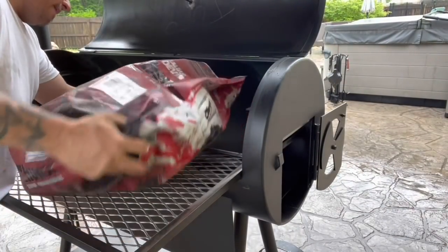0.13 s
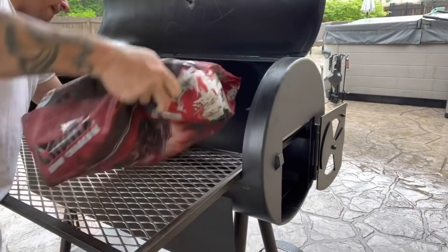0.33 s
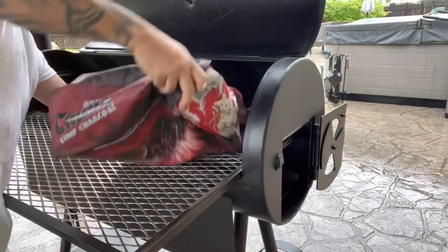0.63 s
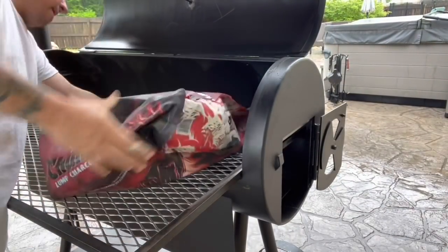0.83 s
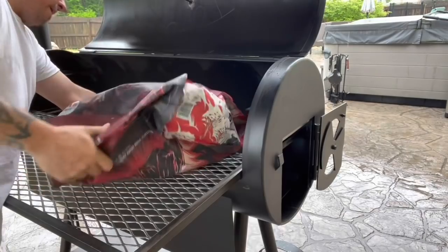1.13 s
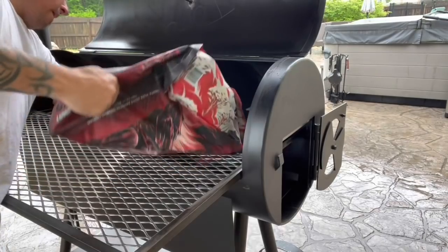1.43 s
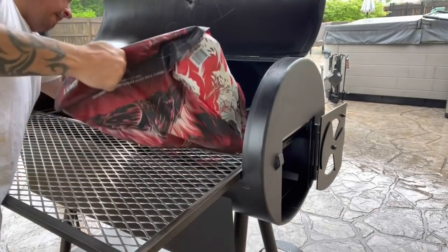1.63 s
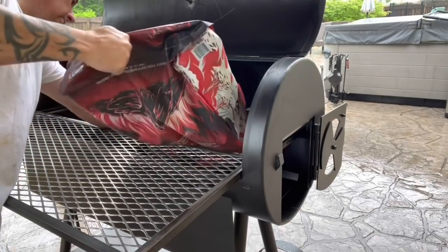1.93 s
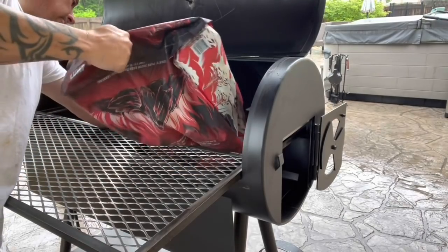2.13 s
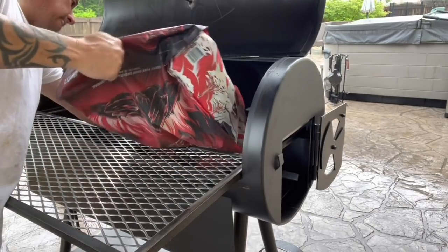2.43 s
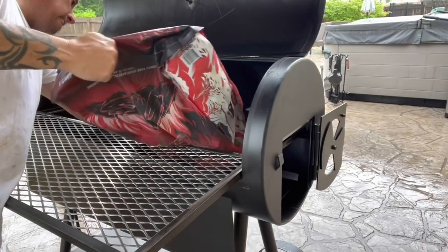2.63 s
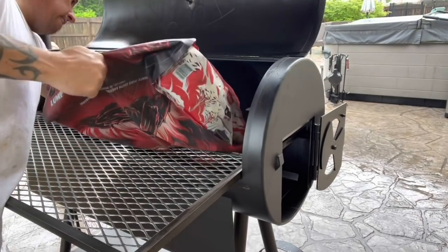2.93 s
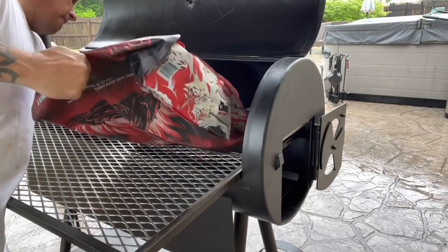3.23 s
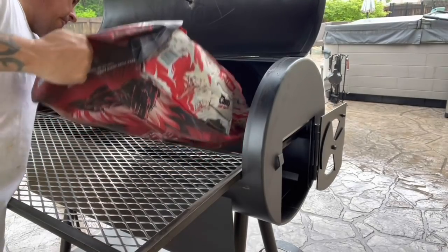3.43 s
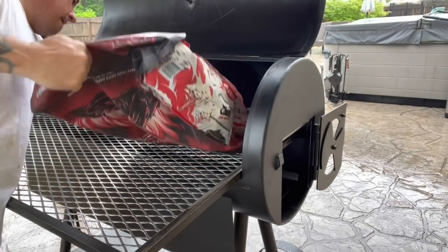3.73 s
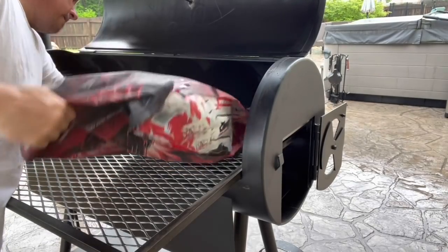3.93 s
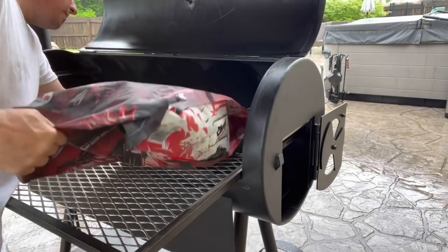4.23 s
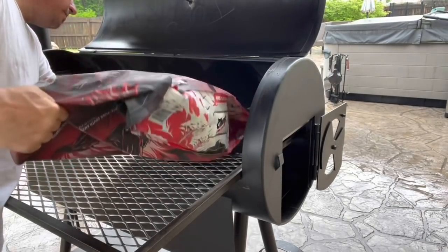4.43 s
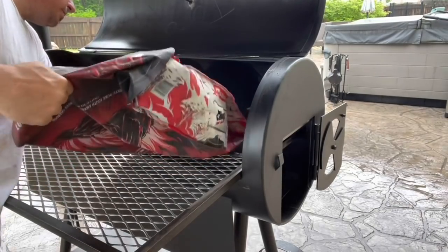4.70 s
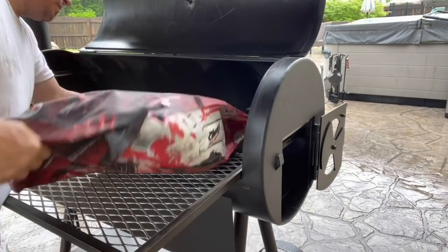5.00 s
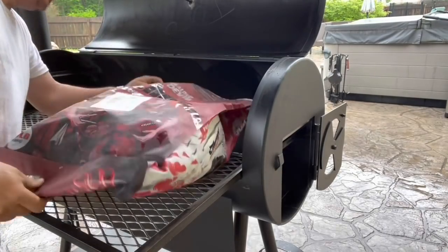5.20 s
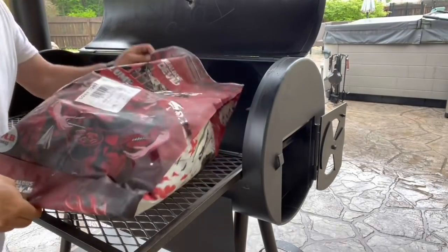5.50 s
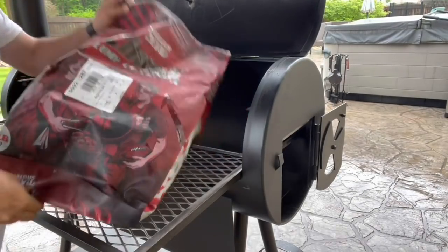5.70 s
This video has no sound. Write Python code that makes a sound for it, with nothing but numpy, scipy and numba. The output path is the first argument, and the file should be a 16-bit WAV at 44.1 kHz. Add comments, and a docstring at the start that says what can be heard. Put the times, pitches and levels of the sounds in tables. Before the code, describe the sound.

A stiff paper sack scrapes and crackles over metal mesh, then charcoal clatters into a steel barrel and thins to scattered clinks outdoors.

```python
"""A stiff paper sack scrapes, snaps and crumples as it is dragged over a mesh shelf and tipped in a quiet yard.
The paper is made of dense ticks, sharp pulses, short crunches and a few gliding squeals.
Charcoal slides out as a stream of small ringing strikes, then lumps clatter and clink one by one.
A steel barrel rings under them with fixed tones and a short noisy echo; low shudder and faint air lie below."""
import sys
import numpy as np
from scipy import signal
from scipy.fft import rfft, irfft, next_fast_len
from scipy.io import wavfile
from scipy.ndimage import uniform_filter1d
from numba import njit

SR = 44100
rng = np.random.default_rng(int(sys.argv[2]) if len(sys.argv) > 2 else 0)


def transcribe(u):
    """Save the signal u as a 16-bit wav file named by the first command-line argument.

    u: samples, shape (n,) or (channels, n), limited to [-1, 1]; the rate is SR.
    q: integer samples, one column per channel.
    """
    v = np.clip(np.atleast_2d(u).T, -1, 1)
    q = np.round(v * 32767).astype(np.int16)
    wavfile.write(sys.argv[1], SR, q)


N = 258293  # length in samples

# tone colour of rubbing paper: f/Hz, relative level/dB
PAPER = [(59, -41), (100, -25), (157, -11.5), (202, -8), (473, -1.5), (1110, -4.5), (1420, -4.5),
         (2830, -3), (3990, -5.5), (6610, -7), (7500, -15), (9750, -33), (16500, -120)]
# strokes of the sack scraping and crumpling: t/s, hold/s, level/dB,
# part above 2.5 kHz against the level/dB (before the treble setting in sack), low thud against the level/dB
STROKES = [(0, 0.052, -34.5, -3, -35), (.059, 0.13, -33.5, 1.5, -31), (0.157, 0.049, -28.5, -3.5, -34),
           (.212, .16, -29, 1, -33), (0.382, .35, -30, 5, -31.5), (0.727, 0.058, -29, 6, -37),
           (.792, 0.049, -25, 3.5, -33), (0.853, .12, -34.5, 4, -34), (1.092, 1.18, -43.5, 1.5, -28.5),
           (4.507, 0.037, -30.5, -19, -28), (4.548, 0.07, -34, 1, -27), (4.68, 0.032, -26, -2.5, -27),
           (4.725, .036, -34.5, 4.5, -30), (4.759, 0.046, -30, 3, -24), (5.771, .069, -36, -8.5, -24)]
# charcoal sliding out of the sack: t/s, level/dB
FLOW = [(.95, -37.5), (1.18, -35), (1.39, -37.5), (1.5, -43.5), (1.72, -40), (1.85, -33.5), (2.18, -24),
        (2.42, -31), (2.52, -43), (3.05, -43.5), (3.21, -58)]
# ringing tones (modes) of the steel barrel and its grate: f/Hz, relative level/dB, t60/s
STEEL = [(458, -12, .35), (797, -9, .22), (1247, -6, .6), (1317, -4, .5), (1565, -9, .6), (1819, -8, .4),
         (2055, 1.5, .5), (2183, -2, .55), (2285, -2, .35), (2568, -3, .55), (2800, -10, .4),
         (3176, -3, .35), (3296, -2, .35), (3558, -9, .35), (3790, -9, .35), (4062, 2, .3), (4334, -6, .25),
         (4873, -4, .3), (5192, -3, .28), (5696, -7, .2), (6317, -3, .18), (6477, -2, .18)]
TOP_HZ = 7120  # little is heard above this
CLINK_OCTAVES = 0.14  # spread of the tones of one lump


def undb(db):
    """Turn decibels into a gain."""
    return 10 ** (np.asarray(db) / 20)


def unit(x):
    """Scale to an average strength (rms) of 1."""
    return x / np.sqrt(np.mean(x ** 2) + 1e-20)


def curve(rows, outside=None):
    """Join rows of (time in s, value) by straight lines."""
    rows = np.asarray(rows, float)
    return np.interp(np.arange(N) / SR, rows[:, 0], rows[:, 1], outside, outside)


def add(track, s, x):
    """Mix a sound into the track at time s."""
    start = max(int(s * SR), 0)
    track[start:start + len(x)] += x[:max(N - start, 0)]


def fade(t, t60):
    """Die away exponentially, by 60 dB in t60 seconds."""
    return np.exp(-np.log(1000) * t / t60)


def colour(x, points):
    """Filter a sound by a curve of (Hz, dB) points and scale it to rms 1."""
    hz, db = np.transpose(points)
    f = np.arange(len(x) // 2 + 1) * SR / len(x)
    gain = undb(np.interp(np.log(f + 1), np.log(hz), db))
    return unit(np.fft.irfft(rfft(x) * gain, len(x)))


def bell(centre_hz, octaves, size=2048):
    """Response of a damped piece to a tap: one broad hump of pitch, scaled to energy 1."""
    f = np.arange(size // 2 + 1) * SR / size + 1
    hump = -(np.log2(f / centre_hz) / octaves / 2) ** 2
    log_gain = hump - np.maximum(f - TOP_HZ, 0) / 500
    # folding the cepstrum makes the response start at once (minimum phase)
    cepstrum = irfft(np.maximum(log_gain, -6.6))
    cepstrum[1:size // 2] *= 2
    cepstrum[size // 2 + 1:] = 0
    response = irfft(np.exp(rfft(cepstrum)))
    return response / np.linalg.norm(response)


def grains(n, rate, scatter_db):
    """Tiny contacts at random moments (rate per second), with scattered strengths; rms 1."""
    size = undb(scatter_db * np.minimum(rng.exponential(size=n), 4))
    happens = rng.random(n) < rate / SR
    return unit(happens * size * rng.choice([-1, 1], n))


def walk(rate):
    """Smooth random wander with rms near 1, drawing a new value rate times a second."""
    k = max(int(SR / rate), 1)
    steps = np.repeat(rng.standard_normal(N // k + 1), k)
    return unit(uniform_filter1d(steps, k)[:N])


def split(x, hz):
    """Separate the parts below and above hz."""
    low = signal.sosfiltfilt(signal.butter(3, hz, fs=SR, output="sos"), x)
    return low, x - low


@njit
def resonant_highpass(x, hz, damping):
    """Remove the lows with a filter whose edge moves and whose peak grows as damping falls."""
    y, b, l = np.empty(len(x)), 0., 0.
    for i in range(len(x)):
        g = np.tan(np.pi * hz[i] / SR)
        v = (b + g * (x[i] - l)) / (1 + g * (g + damping))
        low = l + g * v
        y[i] = x[i] - damping * v - low
        b, l = 2 * v - b, 2 * low - l
    return y


def gesture(s, hold_s, attack_s=0.0051, release_t60=0.11):
    """Loudness of one hand movement: a quick rise, a hold, then a decay."""
    t = np.maximum(np.arange(N) / SR - s, 0)
    return (1 - np.exp(-t / attack_s)) * fade(np.maximum(t - hold_s, 0), release_t60)


def jostle(low_hz, rate, scatter_db, ring_t60, patchy_db, count=14):
    """Pieces of many sizes are struck at their own moments, small ones more often; each strike dies away."""
    decay = fade(np.arange(SR // 12) / SR, ring_t60)
    out = np.zeros(N)
    for piece_hz in np.geomspace(low_hz, 6800, count):
        strikes = grains(N, rate * np.sqrt(piece_hz / low_hz), scatter_db) * undb(patchy_db * walk(35))
        energy = np.abs(signal.oaconvolve(strikes ** 2, decay ** 2)[:N])
        ringing = np.sqrt(energy) * rng.standard_normal(N)
        # higher pieces cover a wider band, so they carry more of the energy
        out += np.sqrt(piece_hz) * unit(signal.oaconvolve(ringing, bell(piece_hz, .17))[:N])
    return unit(out)


def knocks(table, rise_s, tone_share, tick_db, count=3):
    """A struck thing chatters briefly and rings in a tight cluster of tones."""
    out, t = np.zeros(N), np.arange(SR // 3) / SR
    for s, db, pitch_hz, octaves, t60 in table:
        spread = np.linspace(-.8, .8, count) + 0.16 * rng.standard_normal(count)
        mode_hz = pitch_hz * 2 ** (octaves * spread)
        modes = unit(np.sin(2 * np.pi * (np.outer(t, mode_hz) + rng.random(count))).sum(axis=1))
        chatter = unit(signal.fftconvolve(grains(len(t), 3000, 2.75), bell(pitch_hz, octaves))[:len(t)])
        tick = undb(tick_db) * grains(len(t), 3000, 2) * fade(t, 0.013)
        ring = (tone_share * modes + 0.84 * chatter) * fade(t, t60)
        add(out, s, undb(db) * (1 - np.exp(-t / rise_s)) * (ring + tick))
    return out


def rattles(rows, rattle_rate, scatter_db, ring_t60, ring_share, treble_life):
    """Each row is a run of small contacts that ring the pieces and die away, the treble first."""
    out = np.zeros(N)
    for s, db, centre_hz, octaves, t60, rise_s in rows:
        t = np.arange(next_fast_len(max(int(t60 * SR), 4096))) / SR
        ring = rng.standard_normal(len(t)) * fade(t, ring_t60)
        ring *= ring_share / np.linalg.norm(ring)
        ring[0] += .7  # the direct tap ahead of its ring
        contacts = rfft(grains(len(t), rattle_rate, scatter_db))
        rattle = irfft(contacts * rfft(ring) * rfft(bell(centre_hz, octaves), len(t)), len(t))
        # after a soft start, the motion comes to rest around t60
        moving = (1 - np.exp(-t / rise_s)) * np.exp(-(t / t60) ** 4)
        strength = np.sqrt(np.average(rattle ** 2, weights=(moving * fade(t, t60)) ** 2))
        low, high = split(rattle / strength, 2900)
        add(out, s, undb(db) * moving * (low * fade(t, t60) + high * fade(t, t60 * treble_life)))
    return out


def yard(level_db=-54.5, waver_db=0.84):
    """Faint outdoor air: coloured noise that wavers slightly."""
    # tone colour of the air: f/Hz, relative level/dB
    air_colour = [(18, -67), (30, -43), (81, -27), (360, -6.5), (1100, -7.5), (3000, -10.5), (7400, -15),
                  (9750, -40.5), (16500, -120)]
    return undb(level_db + waver_db * walk(6)) * colour(rng.standard_normal(N), air_colour)


def cart(coal, shudder_db=-47):
    """The legs under the barrel shudder: noise below 85 Hz follows the strength of the charcoal."""
    load = np.sqrt(np.abs(uniform_filter1d(coal ** 2, SR // 50)))
    return undb(shudder_db) * load * unit(split(rng.standard_normal(N), 85)[0])


def barrel(x, steel_db=-52, hollow_db=-12, hollow_t60=0.093):
    """The steel rings in its own tones, and the open barrel throws back a short dense echo."""
    # how freely the steel rings, on top of steel_db: t/s, level/dB
    ringing_curve = [(0, -3.5), (.9, -10), (1.05, -3), (1.7, -24), (2.05, -2), (3.1, -4), (3.22, -14)]
    t = np.arange(SR) / SR
    modes = sum(undb(db) * np.cos(2 * np.pi * hz * t) * fade(t, t60) for hz, db, t60 in STEEL)
    echo_colour = [(200, -21), (450, 4.5), (2200, -1.0), (7000, -2.5), (9000, -29.5)]  # f/Hz, level/dB
    echo = colour(rng.standard_normal(SR), echo_colour) * fade(t, hollow_t60)
    steel = undb(steel_db + curve(ringing_curve)) * signal.fftconvolve(x, modes)[:N]
    return steel + undb(hollow_db) * signal.fftconvolve(x, echo / np.linalg.norm(echo))[:N]


def clangs(knock_db=-3, knock_t60=0.0066, knock_octaves=0.74, clang_octaves=0.06):
    """A lump meets bare steel: a dry noisy knock, then the few steel tones near one pitch ring on."""
    # strikes on steel: t/s, level of the ring at its start/dB, centre f/Hz, share of the free ring time
    steel_hits = [(1.022, -21.5, 5020, 0.42), (1.032, -30.5, 2100, 0.51), (1.068, -34.5, 4300, 0.51),
                  (2.05, -24, 2060, 0.97), (2.051, -23, 3200, 0.44), (2.854, -32.5, 2190, 0.65),
                  (2.939, -30, 2200, .8), (2.957, -31.5, 1260, 0.99), (3.058, -21, 4030, 0.64),
                  (3.918, -32.5, 2150, 0.8), (4.099, -31.5, 1480, 0.37), (4.126, -37.5, 3650, .4),
                  (5.054, -33.5, 2260, 0.6)]
    out, t = np.zeros(N), np.arange(SR) / SR
    hz, mode_db, t60 = np.transpose(STEEL)
    for s, db, centre_hz, life in steel_hits:
        nearness = np.exp(-np.square(np.log2(hz / centre_hz) / clang_octaves / 2))
        weight = undb(mode_db) * nearness
        modes = np.sin(2 * np.pi * (np.outer(t, hz) + rng.random(len(hz)))) * fade(t[:, None], life * t60)
        ring = np.sqrt(2) * modes @ weight / np.linalg.norm(weight)
        burst = rng.standard_normal(SR) * fade(t, knock_t60)
        knock = signal.fftconvolve(burst, bell(centre_hz, knock_octaves))[:SR]
        add(out, s, undb(db) * (ring + undb(knock_db) * knock))
    return out


def stray_clinks(coal, clink_db=2, low_hz=750, high_hz=6000, t60=0.022, count=60):
    """Lumps of every size knock together at chance moments, as hard as the charcoal is moving."""
    flow_s, _ = np.transpose(FLOW)
    rows = []
    for when, size in rng.random((count, 2)):
        s = flow_s.min() + when * np.ptp(flow_s)
        motion_db = 20 * np.log10(np.std(coal[int(s * SR):][:SR // 50]))
        rows.append((s, motion_db + clink_db, low_hz * (high_hz / low_hz) ** size, CLINK_OCTAVES, t60))
    return knocks(rows, rise_s=0.00047, tone_share=0.67, tick_db=-11.5)


def clinks(clink_t60=0.055):
    """Single hard lumps knock together and ring briefly, each at its own pitch."""
    # knocks of lump on lump: t/s, level/dB, pitch f/Hz
    lump_knocks = [(1.32, -22.5, 6420), (2.186, -19, 1820), (3.238, -32.5, 4690), (3.306, -31, 2040),
                   (3.535, -29, 2660), (3.696, -34, 5530), (3.81, -34, 6660), (3.834, -31, 5710),
                   (4.022, -29.5, 5220), (4.059, -27.5, 5760), (4.172, -33, 5360), (4.229, -21, 5640),
                   (4.428, -34, 2860), (4.86, -32, 3250), (4.965, -27, 5600), (5.047, -26.5, 5970),
                   (5.094, -25, 6770), (5.467, -38, 4510)]
    rows = [(s, db, hz, CLINK_OCTAVES, clink_t60) for s, db, hz in lump_knocks]
    return knocks(rows, rise_s=0.0014, tone_share=0.56, tick_db=-19.5)


def landings():
    """Each lump lands brightly and also shifts the bed of charcoal, which sounds lower and slower."""
    # lumps tumbling into the barrel: t/s, level/dB, centre f/Hz, spread/octaves, t60/s, rise/s
    lump_falls = [(1.021, -19.5, 4400, 0.19, 0.23, 0.0018), (1.03, -27, 2200, 0.27, 0.49, .003),
                  (1.16, -25, 1210, 0.76, 0.12, 0.0069), (1.906, -22, 4640, 0.41, 0.21, 0.001),
                  (2.0488, -10.5, 2900, 0.53, 0.28, 0.00049), (2.153, -13.5, 4200, 0.67, 0.071, .001),
                  (2.164, -18.5, 1350, 0.8, 0.4, 0.0024), (2.42, -23.5, 2850, 0.5, 0.2, 0.0025),
                  (2.486, -25.5, 4320, 0.55, 0.4, 0.003), (2.565, -29.5, 2500, 0.62, 0.82, 0.011),
                  (2.638, -19, 4430, 0.65, 0.23, 0.0083), (2.702, -27, 1720, 0.91, 0.15, 0.0019),
                  (2.782, -24.5, 2490, 0.49, 0.39, 0.021), (2.853, -28, 1920, 0.35, 0.69, 0.0014),
                  (2.892, -24.5, 3730, 0.26, 0.29, 0.012), (2.938, -17, 2770, 0.44, 0.26, 0.0021),
                  (2.949, -19, 2660, 0.7, 0.52, 0.013), (3.0566, -13, 4000, 0.68, 0.26, 0.00099),
                  (3.125, -23.5, 1510, 0.71, 0.12, 0.0065), (3.498, -24.5, 2730, 0.51, 0.14, 0.01),
                  (3.781, -23, 3980, 0.8, 0.17, 0.0075), (3.913, -19.5, 2950, 0.42, 0.26, 0.0056),
                  (4.098, -22, 1610, 0.6, 0.11, 0.0006), (4.125, -28.5, 1550, 0.65, 0.19, .002),
                  (5.0, -28.5, 2590, 0.18, 0.24, 0.00092), (5.052, -20, 1960, 0.65, 0.18, 0.01),
                  (5.084, -21.5, 3200, 0.73, 0.16, 0.0023), (5.172, -24, 3250, 0.26, 0.1, 0.004),
                  (5.253, -23, 3480, 0.41, 0.11, 0.0047)]
    bed_hz, bed_octaves, bed_t60, bed_rise_s = 1230, 0.51, 0.21, 0.014
    # the shift is -4.5 dB under a landing of 0 dB, and drops by 1.57 dB for each dB the landing drops
    shifts = [(s, -4.5 + 1.57 * db, bed_hz, bed_octaves, bed_t60, bed_rise_s) for s, db, *_ in lump_falls]
    return list(lump_falls) + shifts


def drops():
    """Lumps tumble into the barrel: each one is a ringing rattle of contacts."""
    return rattles(landings(), rattle_rate=1500, scatter_db=1.4, ring_t60=0.053, ring_share=0.54,
                   treble_life=0.79)


def slide(dust_db=-5, surge_db=1.0, ring_t60=0.044):
    """Lumps jostle in small surges over a crackle of sliding crumbs."""
    # tone colour of sliding charcoal: f/Hz, relative level/dB
    coal_colour = [(59, -54.5), (100, -17.5), (290, -16), (464, -4), (527, -7), (784, -4.5), (1050, -11.5),
                   (1210, -7), (2120, -2), (2450, -6), (5930, -5.5), (6730, -13), (7500, -8), (9750, -61),
                   (16500, -120)]
    lumps = jostle(low_hz=450, rate=90, scatter_db=3.1, ring_t60=ring_t60, patchy_db=2.5)
    crumbs = undb(dust_db) * grains(N, 3000, 3.1)
    stream = colour(lumps + crumbs, coal_colour)
    return undb(curve(FLOW, outside=-120) + surge_db * walk(45)) * stream


def settling(flutter_db=4):
    """Paper and crumbs rustle faintly with every gentle shake."""
    # gentle shakes of the nearly empty sack: t/s, hold/s, level/dB
    shake_table = [(3.435, 0.061, -50.5), (3.555, 0.12, -49), (3.756, 0.11, -48), (4.817, 0.164, -46),
                   (4.996, 0.29, -52.5)]
    shaking = sum(undb(db) * gesture(s, hold_s) for s, hold_s, db in shake_table)
    return shaking * undb(flutter_db * walk(30)) * colour(grains(N, 900, 1.7), PAPER)


def bumps(bump_cycles=44):
    """The sack knocks on the shelf with a soft, hollow ring; low bumps last longer."""
    # bumps on the shelf: t/s, level/dB, pitch f/Hz, spread/octaves
    shelf_bumps = [(0.018, -36.5, 174, 0.27), (.511, -13.5, 516, 0.09), (0.798, -29.5, 334, 0.5),
                   (.824, -24, 506, 0.29), (2.628, -33.5, 475, 0.34), (3.236, -36, 468, 0.17),
                   (3.27, -32.5, 773, 0.18), (3.547, -25, 810, 0.45), (3.655, -40, 630, 0.23),
                   (3.863, -30, 624, 0.39), (4.464, -37, 500, 0.6), (4.523, -24, 403, 0.28),
                   (4.597, -24.5, 448, 0.52), (4.687, -29.5, 370, 0.43), (4.775, -19, 690, 0.37),
                   (4.865, -26, 474, 0.57), (5.144, -35.5, 533, 0.47), (5.756, -35, 268, 0.57),
                   (5.785, -31, 330, 0.51)]
    rows = [(s, db, hz, octaves, bump_cycles / hz) for s, db, hz, octaves in shelf_bumps]
    return knocks(rows, rise_s=0.0018, tone_share=0.4, tick_db=-10.0)


def squeals(attack_s=0.0018, release_t60=0.062, wobble_hz=60, tone_flutter_db=4):
    """The sack sticks and slips at one resonance: a gliding tone that wobbles more the rougher the grip."""
    # groans and squeaks: t/s, hold/s, level/dB, start f/Hz, end f/Hz, roughness from 0 to 1
    squeal_table = [(0, 0.044, -30.5, 328, 320, 0.27), (.39, 0.12, -31.5, 512.4, 570, 0.67),
                    (.53, 0.078, -36.5, 517, 575, 0.8), (0.647, 0.013, -21.5, 2880, 2830, 0.7)]
    out, t = np.zeros(N), np.arange(SR // 4) / SR
    for s, hold_s, db, start_hz, end_hz, rough in squeal_table:
        glide = np.interp(t, [0, hold_s], [start_hz, end_hz])
        hz = glide + rough * wobble_hz * walk(250)[:len(t)]
        flutter = undb(rough * tone_flutter_db * walk(140)[:len(t)])
        grip = (1 - np.exp(-t / attack_s)) * fade(np.maximum(t - hold_s, 0), release_t60)
        tone = unit(np.sin(2 * np.pi * np.cumsum(hz) / SR) * flutter)
        add(out, s, undb(db) * grip * tone)
    return out


def crunches(rise_s=0.00073):
    """A fold of the sack gives way in a quick run of dry ticks."""
    # collapsing folds: t/s, level/dB, centre f/Hz, spread/octaves, t60/s
    fold_table = [(0.23, -22, 1000, 0.57, 0.035), (.294, -15.5, 2300, 1.1, 0.11),
                  (.512, -17.5, 2200, 0.5, 0.084), (.648, -24, 2900, .5, 0.065),
                  (.709, -16, 3500, 0.83, 0.036), (0.91, -20.5, 6360, .25, 0.063),
                  (1.285, -7.5, 2520, 0.24, 0.014), (1.319, -22.5, 1700, 1.1, 0.071),
                  (1.559, -26.5, 2400, 1.1, 0.046), (1.807, -17.5, 2070, 1.03, 0.088),
                  (3.544, -26.5, 1480, 0.83, 0.068), (3.739, -29.5, 1680, 0.33, 0.025),
                  (3.861, -20, 2420, 0.43, 0.045), (4.514, -29, 1290, 0.61, 0.061),
                  (4.53, -25.5, 1110, 0.66, 0.096), (4.552, -23, 2940, 0.24, 0.092),
                  (4.604, -25.5, 1410, 0.82, 0.051), (4.691, -17.5, 1900, 0.9, 0.062),
                  (4.739, -24.5, 2880, 0.32, 0.21), (4.765, -19.5, 2700, 0.53, 0.043),
                  (4.775, -16.5, 890, 0.77, 0.037), (4.787, -17.5, 2300, 0.46, 0.032),
                  (4.801, -22, 3530, 0.6, 0.11), (4.866, -31.5, 2000, 0.51, 0.1),
                  (4.942, -30, 2800, 0.91, 0.046), (5.203, -26.5, 2600, 0.41, 0.057),
                  (5.275, -30, 1510, 0.56, 0.055)]
    rows = [(*row, rise_s) for row in fold_table]
    return rattles(rows, rattle_rate=2400, scatter_db=1.5, ring_t60=0.0035, ring_share=0.4, treble_life=0.7)


def stray_snaps(count=50, stray_db=-4, stray_hz=1870):
    """Small snaps at chance moments follow the strength of the strokes: rows of t/s, level/dB, f/Hz."""
    effort = sum(undb(db) * gesture(s, hold_s) for s, hold_s, db, *_ in STROKES)
    rows = []
    for when, size in rng.random((count, 2)):
        stroke_db = 20 * np.log10(effort[int(when * N)] + 1e-9)
        # up to an octave either side of stray_hz
        rows.append((when * N / SR, stroke_db + stray_db, stray_hz * 2 ** (2 * size - 1)))
    return rows


def snaps(snap_db=-1, crackle_db=-1, crackle_t60=0.079, panel_share=0.35, panel_t60=0.0097, snap_octaves=0.68):
    """A crease flips with one sharp pulse, the stiff panel beside it rings, and smaller creases crackle."""
    # creases snapping through: t/s, relative level/dB, centre f/Hz
    crease_table = [(.192, -15.5, 1224), (.2659, -7.5, 1580), (.3046, -12, 2910), (.3228, -17.5, 2260),
                    (.414, -16.5, 3140), (.5021, -18.5, 2350), (.5888, -28, 1630), (.6974, -16, 1510),
                    (.7378, -16, 3230), (.7627, -10, 1890), (.807, -13, 1700), (.8277, -17.5, 1410),
                    (.851, -18.5, 1190), (.9408, -17.5, 2600), (1.0164, -23, 3170), (1.0258, -11.5, 4600),
                    (1.1968, -21.5, 1150), (1.286, -14, 2360), (1.5609, -27, 1800), (1.6228, -30.5, 1140),
                    (1.8348, -18.5, 2270), (3.5465, -25.5, 1540), (3.881, -32, 1850), (4.369, -28, 3630),
                    (4.7657, -22, 2200), (4.7892, -17, 2000), (4.556, -32.5, 2400), (4.9248, -31, 2680),
                    (5.7771, -21, 1980)]
    out, t = np.zeros(N), np.arange(SR // 10) / SR
    for s, db, centre_hz in list(crease_table) + stray_snaps():
        # louder snaps are cleaner: 0.75 dB less crackle, against the pulse, for each dB
        after_db = min(0.75 * (-29.5 - db), 4)
        panel = panel_share * rng.standard_normal(len(t)) * fade(t, panel_t60)
        crackle = undb(after_db + crackle_db) * grains(len(t), 4600, 0.49) * fade(t, crackle_t60)
        push = panel + crackle
        push[0] += 8 * undb(snap_db)  # the sharp pulse
        add(out, s, undb(db) * signal.fftconvolve(push, bell(centre_hz, snap_octaves)))
    return out


def sack(rate=3000, scatter_db=-2.5, flutter_db=0.1, facet_db=3, damping=1.0, treble_db=-5.5):
    """Paper catches on the mesh in dense ticks and its facets buckle, coloured by the hollow of the sack."""
    # moving lowest resonance of the sack: t/s, f/Hz
    hollow_curve = [(.08, 299), (.18, 213), (.36, 242), (.42, 480), (.5, 522), (.61, 483), (.75, 214),
                    (.95, 222), (1.1, 385), (4.6, 265), (5.8, 240)]
    facets = jostle(low_hz=200, rate=200, scatter_db=3.0, ring_t60=.016, patchy_db=2.6)
    rubbing = colour(grains(N, rate, scatter_db) + undb(facet_db) * facets, PAPER)
    low, high = split(rubbing * undb(flutter_db * walk(60)), 2500)
    edge_hz = curve(hollow_curve)
    body = unit(resonant_highpass(resonant_highpass(low, edge_hz, damping), edge_hz, damping))
    treble = unit(high)
    thud = unit(split(grains(N, 430, 3.3), 430)[0])
    out = np.zeros(N)
    for s, hold_s, db, crisp_db, thud_db in STROKES:
        crisp = undb(crisp_db + treble_db) * treble
        out += undb(db) * gesture(s, hold_s) * (body + undb(thud_db) * thud + crisp)
    return out


def scene():
    """Mix all layers; charcoal rings the barrel fully, the sack only a little."""
    paper = sack() + snaps() + crunches() + squeals() + settling() + bumps()
    coal = slide() + drops() + clinks()
    # two rounds of chance knocks; the second also follows the first
    coal = coal + stray_clinks(coal)
    coal = coal + stray_clinks(coal)
    # two layers of clangs at the same moments, with different random phases
    steel_strikes = clangs() + clangs()
    return (paper + coal + steel_strikes + barrel(coal + 0.4 * paper) + cart(coal) + yard())[None]


def record(dry):
    """Flatten the sharpest peaks, then cut nearly everything above about 7 kHz."""
    lowpass = signal.ellip(8, .3, 76, TOP_HZ, fs=SR, output="sos")
    return signal.sosfilt(lowpass, np.clip(dry, -.75, .75))


dry = scene()
out = record(dry)
transcribe(out)
```